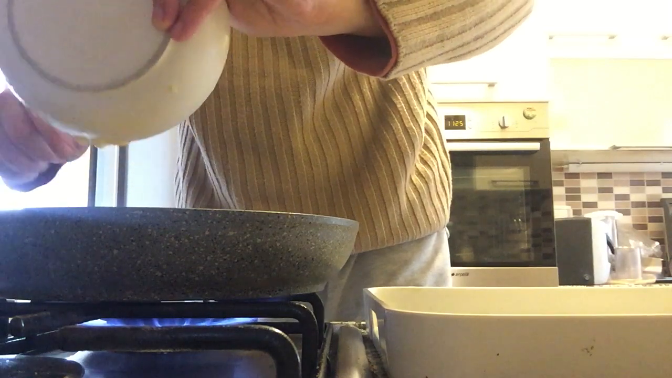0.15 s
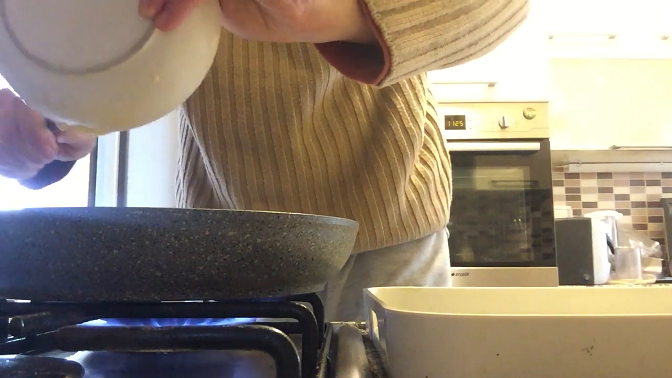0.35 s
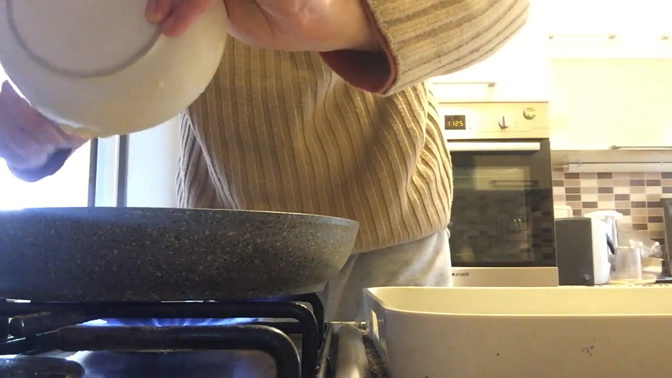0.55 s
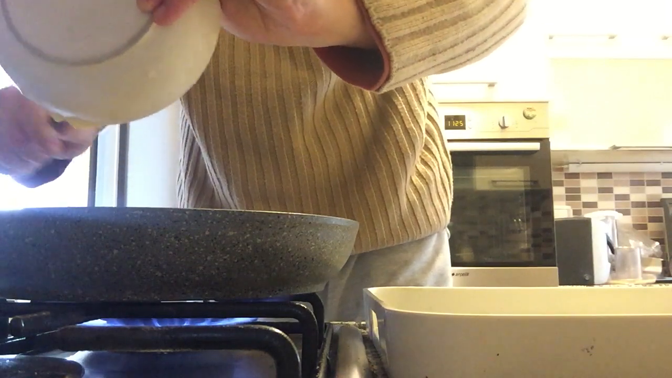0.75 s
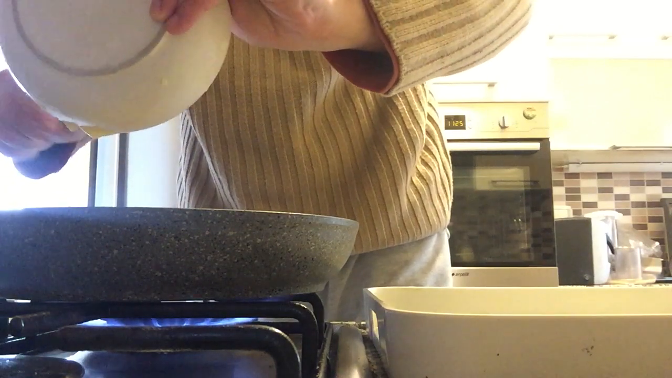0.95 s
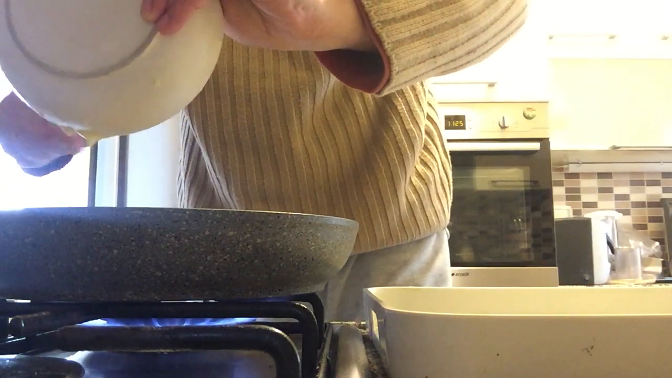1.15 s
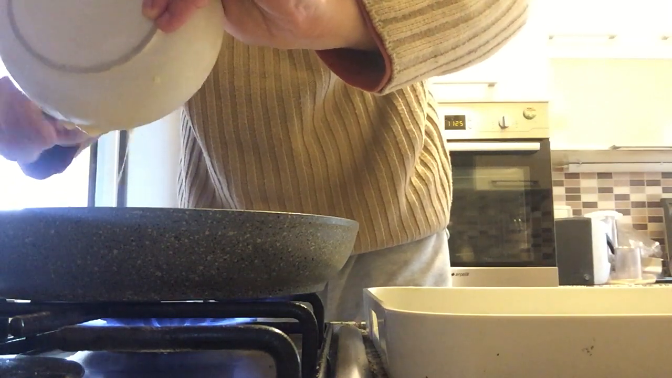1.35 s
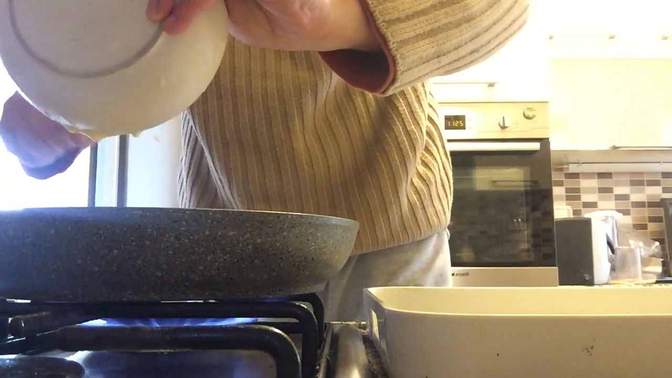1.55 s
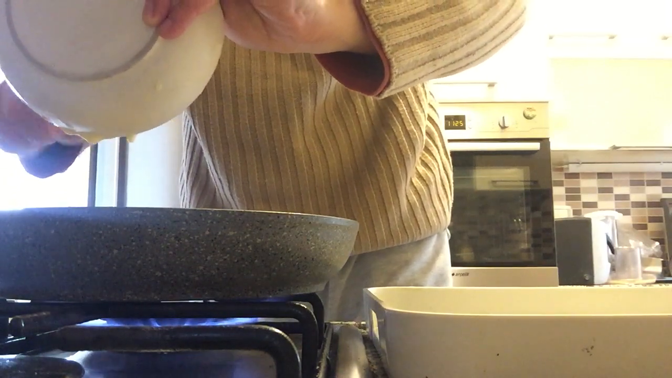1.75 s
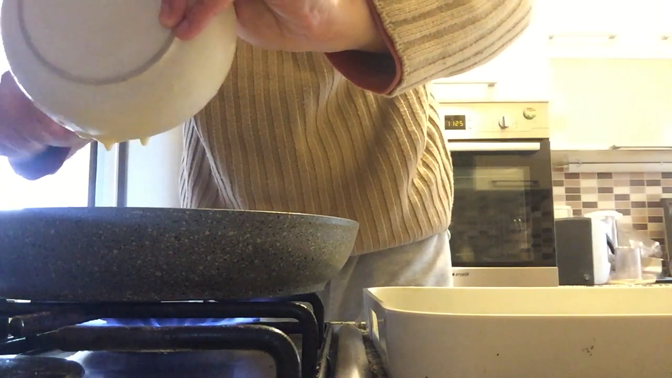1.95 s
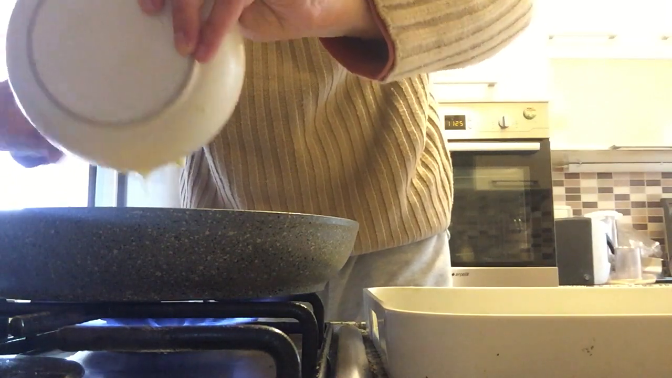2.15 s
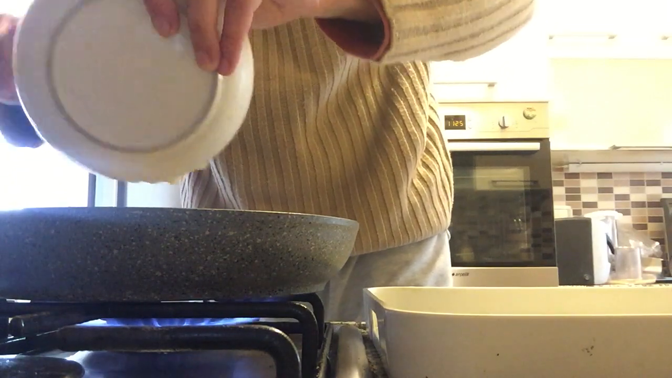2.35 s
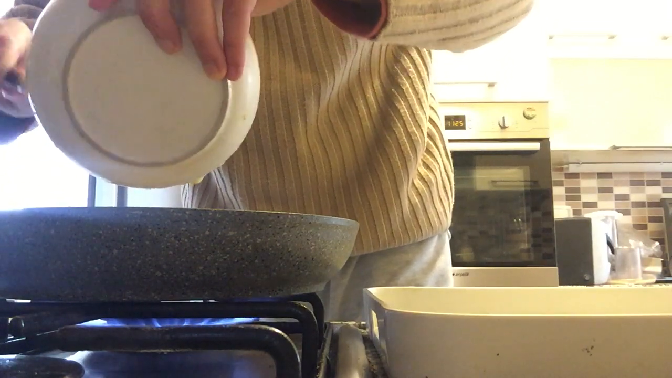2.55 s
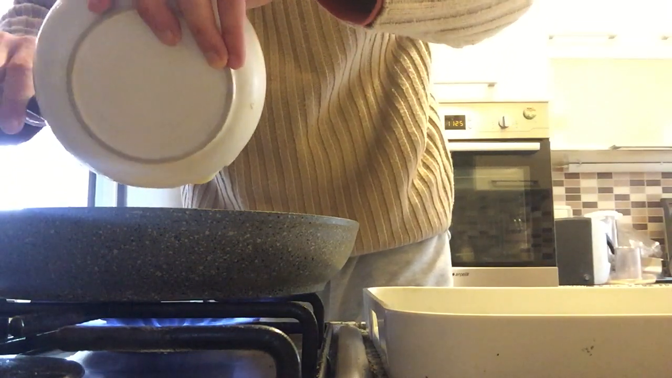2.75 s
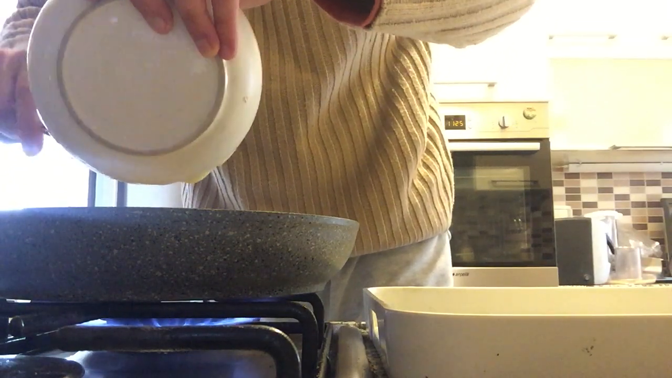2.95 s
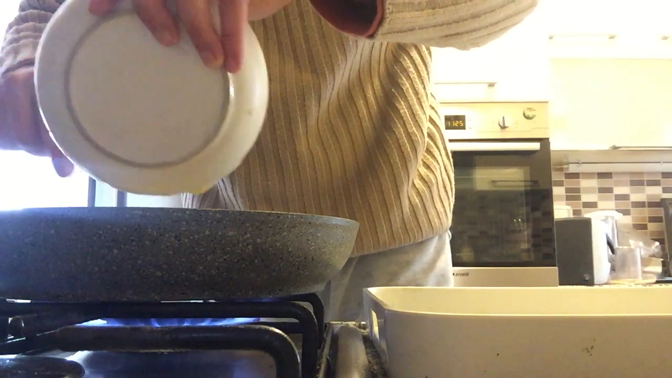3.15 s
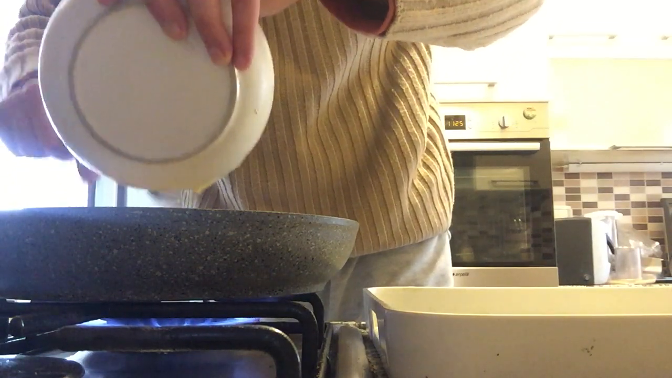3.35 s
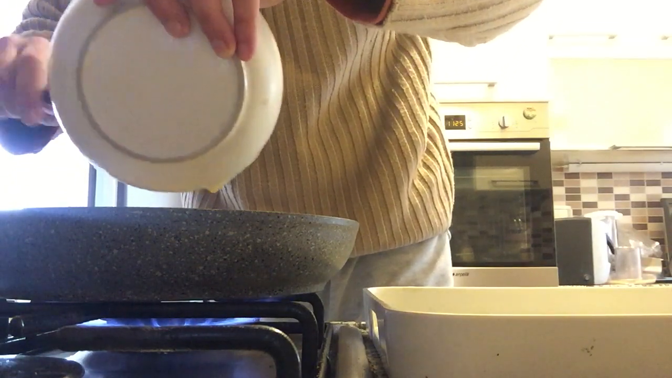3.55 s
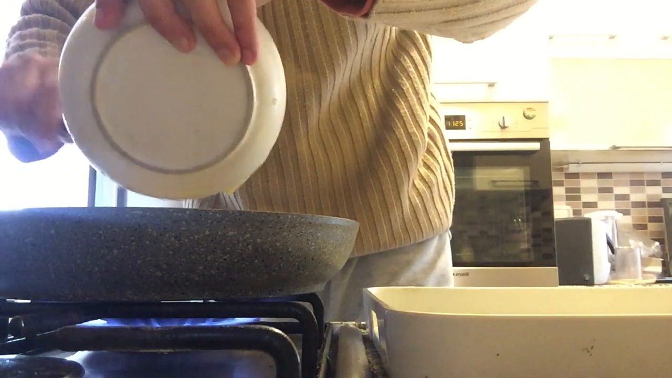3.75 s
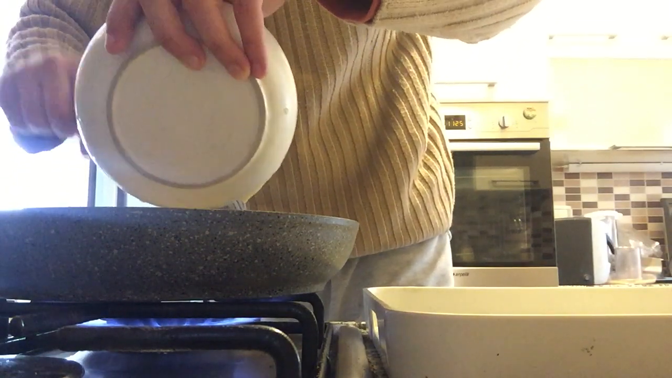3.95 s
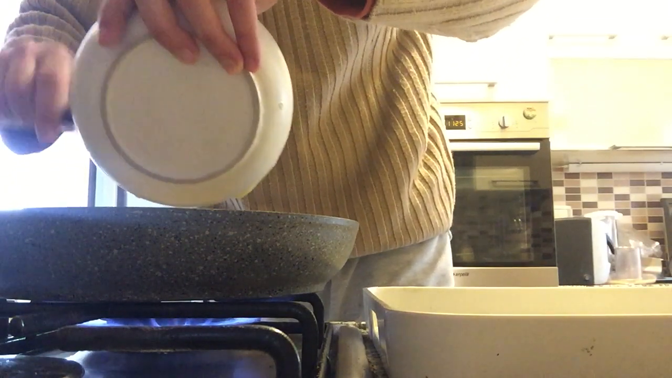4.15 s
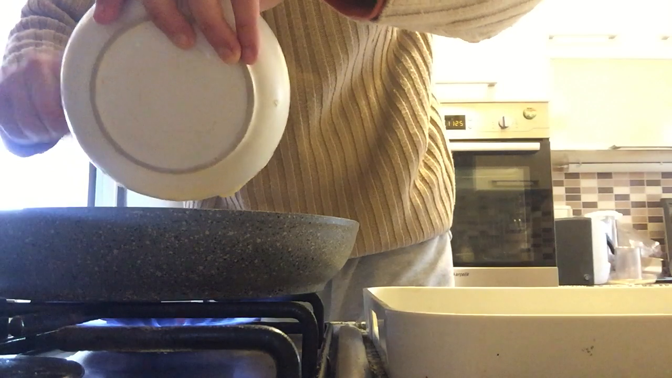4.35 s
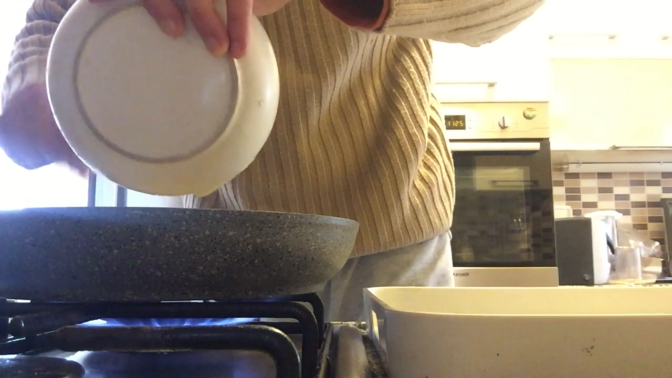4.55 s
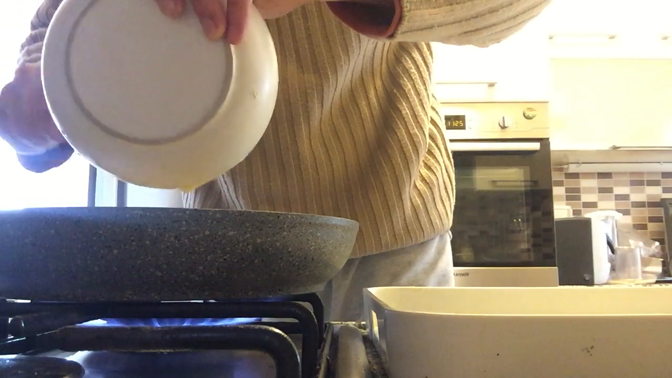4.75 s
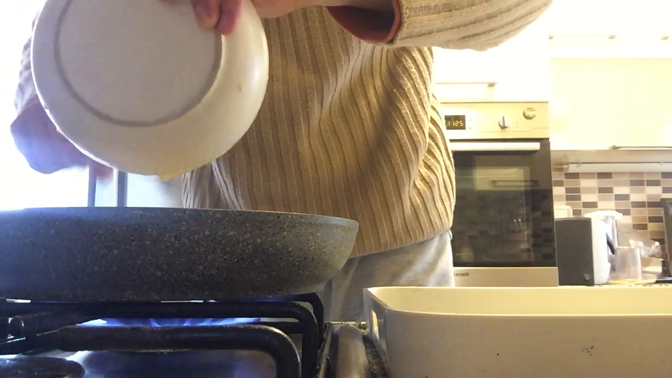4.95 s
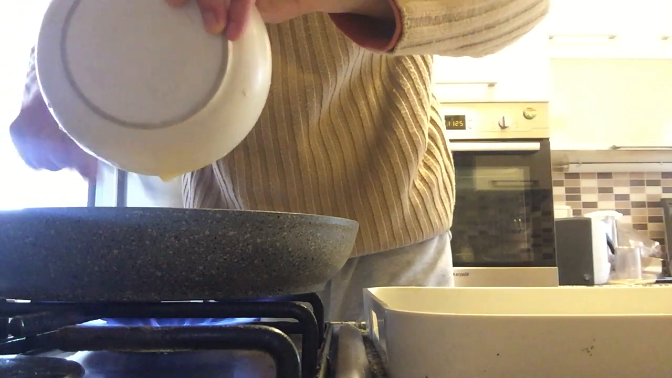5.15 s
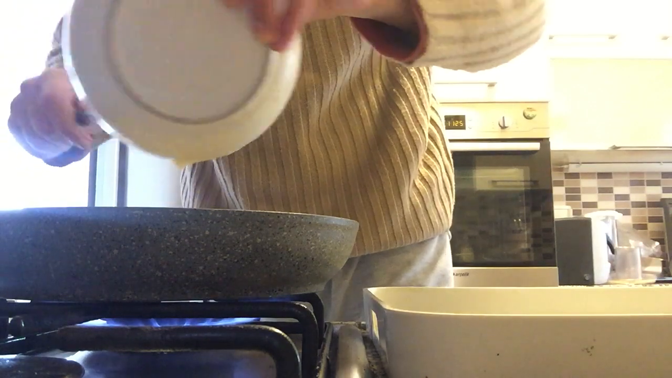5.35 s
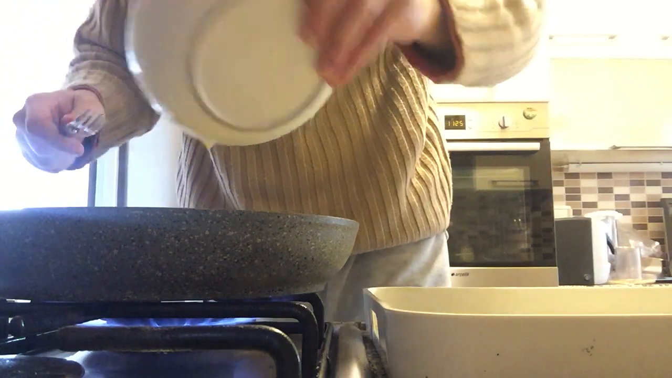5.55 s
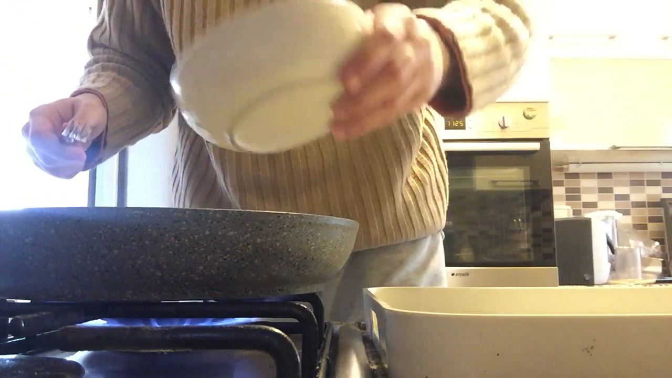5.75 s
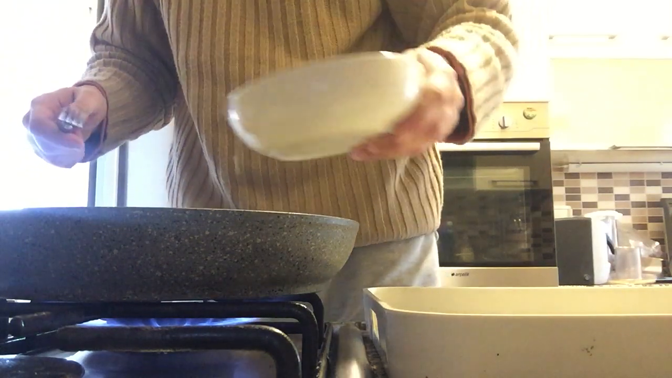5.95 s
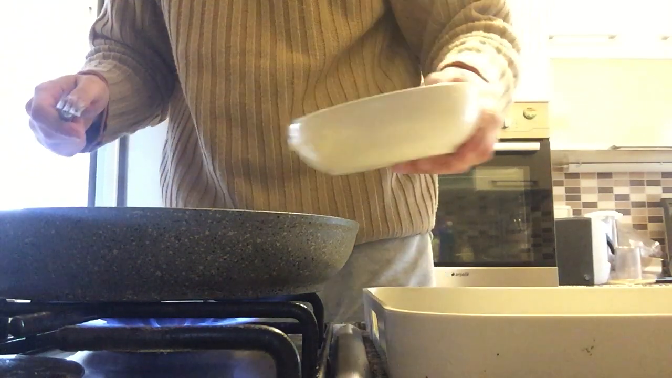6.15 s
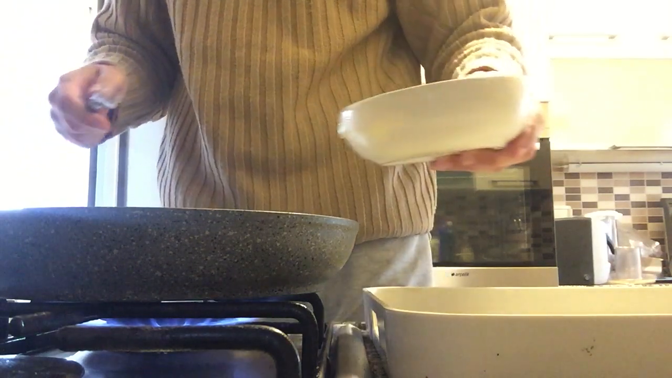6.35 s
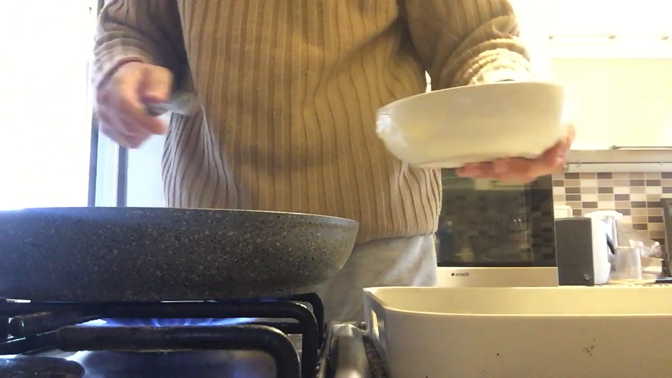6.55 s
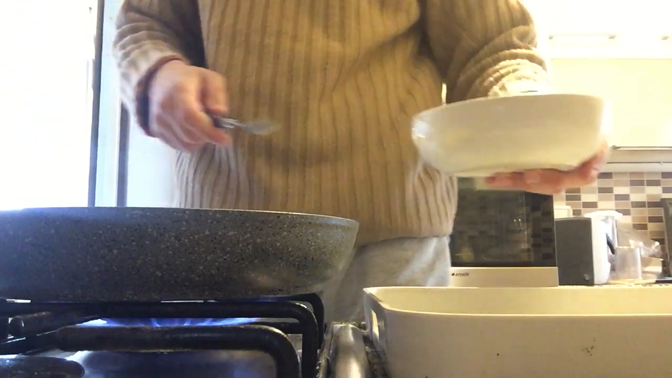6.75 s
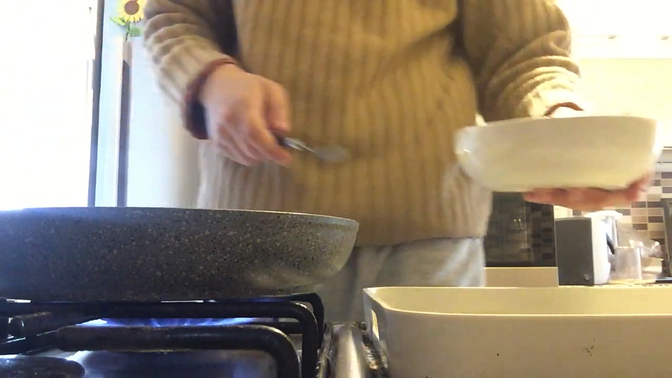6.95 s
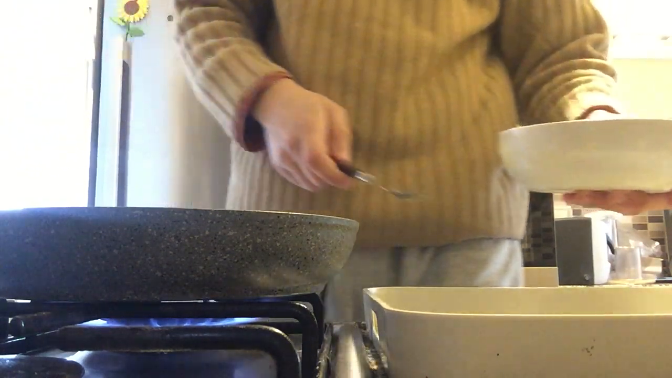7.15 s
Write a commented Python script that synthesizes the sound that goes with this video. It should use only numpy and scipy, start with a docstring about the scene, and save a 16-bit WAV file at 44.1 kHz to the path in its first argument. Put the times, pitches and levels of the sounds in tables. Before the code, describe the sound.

A gas burner hisses steadily for the whole seven seconds, with a low, wavering flame flutter underneath, heard close to the hob in a small kitchen. From the start a steel fork taps and scrapes inside a hand-held ceramic bowl. The clinks are short, bright and quickly damped, uneven in timing and strength, with a slight room echo. Clear ones come at about 0.8, 1.1 and 1.5 seconds, a loud one at 2.2, then others at 2.6, 3.4 and 3.7. Between them the tines drag over wet glaze in soft, brief rasps until about 4.4 seconds. A few light ticks lead to another loud clink at 4.9 seconds and a quick double clink at 5.2. After that the burner continues alone, apart from one faint, brief brush of a sleeve at about 6.7 seconds.

```python
"""A small kitchen, one microphone close to the hob, where a gas burner hisses under a frying pan.
A steel fork scrapes the last of some beaten egg out of a hand-held ceramic bowl into the pan.
Each touch rings the fork and the bowl, both quickly damped by the hands; between touches the tines
drag over wet glaze. Tiles and cupboards answer briefly, and near the end a sleeve brushes softly."""
import sys
import numpy as np
from scipy import signal
from scipy.fft import rfft, irfft
from scipy.io import wavfile

SR = 44100
rng = np.random.default_rng(int(sys.argv[2]) if len(sys.argv) > 2 else 0)


def store_wav(level_fs):
    """Save 16-bit WAV to argv[1]."""
    pcm = np.round(np.clip(np.atleast_2d(level_fs), -1, 1) * 32767)
    wavfile.write(sys.argv[1], SR, pcm.T.astype(np.int16))


N = 317074
RING, ATTACK = int(.25 * SR), int(.02 * SR)  # samples in one short sound, and in its attack
AGE = np.arange(RING) / SR  # seconds since that sound began

# the bowl's wall flexing: (pitch [Hz], t60 [s], level struck at the rim [dB], level struck deep [dB])
WALL_MODES = [(862, 0.057, -22, -15.5), (955, 0.013, -34, -7.5), (1595, 0.031, -31, 0),
              (1975, 0.075, -5, -8.5), (2065, 0.05, -2, -8.5), (2300, 0.069, 0.5, -12),
              (2800, 0.15, -11.5, -11), (3140, 0.028, -37, 5.5), (3415, 0.084, -6.5, -6),
              (3920, 0.092, 6.5, -22.5)]


def undb(db):
    """Decibels to gain."""
    return 10 ** (np.asarray(db) / 20)


def between(ends, share):
    """The value a share of the way from one end to the other."""
    return ends[0] + np.clip(share, 0, 1) * (ends[1] - ends[0])


def spectrum(points, size):
    """Gain of (Hz, dB) points on the frequency grid of a sound of this size."""
    hz, db = np.transpose(points)
    grid = np.maximum(np.fft.rfftfreq(size, 1 / SR), 1)
    return undb(np.interp(np.log(grid), np.log(hz), db))


def colour(x, points):
    """Causal filter with the given spectrum, so attacks stay sharp."""
    cepstrum = irfft(np.log(spectrum(points, size=2048)))
    half = len(cepstrum) // 2
    fold = np.r_[1, np.full(half - 1, 2), np.zeros(half)]
    response = irfft(np.exp(rfft(cepstrum * fold)))
    return signal.fftconvolve(x, response)[:len(x)]


def gliding_band(x, hz, width_hz):
    """One resonance whose centre moves."""
    turn = np.exp(2j * np.pi * np.cumsum(hz) / SR)
    pole = np.exp(-np.pi * width_hz / SR)
    return (turn * signal.lfilter([1], [1, -pole], x / turn)).real


def noise(gain):
    """Steady noise with the given amplitude per root Hz."""
    bins = rng.standard_normal(len(gain)) + 1j * rng.standard_normal(len(gain))
    return irfft(bins * gain, N) * np.sqrt(N * SR) / 2


def waver(per_s):
    """A random drift with a spread of 1."""
    steps = rng.standard_normal(512)
    return np.interp(np.arange(N) / SR * per_s, np.arange(len(steps)), steps) * np.sqrt(3 / 2)


def fade(t60):
    """Exponential decay, 60 dB down after t60 seconds."""
    return undb(-60 * AGE / t60)


def level(x, db):
    """Set the rms of a blow's attack."""
    return x * undb(db) / np.sqrt(np.mean(x[:ATTACK] ** 2))


def add(track, start_s, x):
    """Mix x into the track from this time on."""
    i = int(start_s * SR)
    track[i:i + len(x)] += x[:N - i]


def burner(hiss_waver_db=0.86, flame_waver_db=2.5):
    """Close by under the pan, turbulent gas sounds the burner's resonances; the flames flutter below."""
    # gas rushing through the burner: (frequency [Hz], density [dB per Hz])
    gas_rush = [(300, -106), (560, -102), (1000, -93), (1550, -101.5), (2000, -86), (2500, -101),
                (3350, -109), (4300, -103), (5500, -107), (7700, -100), (9600, -108), (11500, -99),
                (13900, -109), (15500, -105)]
    # mixing tube, burner head and gap under the pan: (pitch [Hz], width [Hz], density [dB per Hz])
    resonances = [(728, 31, -90), (1031.5, 32, -83), (1236, 51, -75), (1334.4, 134, -74), (1604, 31, -80.5),
                  (1740, 135, -75), (2170, 47, -83), (2407, 37, -93), (2620, 400, -99), (3135, 28, -90.5),
                  (3765, 145, -84.5), (4136, 18, -89), (4590, 62, -92.5), (4893, 93, -93.5),
                  (6450, 242, -87.5), (6940, 15, -87), (9050, 114, -93), (10400, 61, -92.5),
                  (11160, 550, -91), (11460, 150, -97), (12120, 100, -100), (12960, 170, -93.5),
                  (14400, 110, -105)]
    # low flutter of the flames: (frequency [Hz], density [dB per Hz])
    flame_flutter = [(25, -114), (50, -90.5), (70, -85.5), (92, -82.5), (110, -76.5), (135, -91.5),
                     (162, -90), (198, -82), (230, -88.5), (310, -89), (400, -94.5), (600, -110),
                     (1200, -130)]
    grid = np.fft.rfftfreq(N, 1 / SR)
    power = spectrum(gas_rush, N) ** 2
    for hz, width_hz, db in resonances:
        power += undb(db) ** 2 / (1 + 2 * ((grid - hz) / width_hz) ** 2) ** 2
    hiss = noise(np.sqrt(power))
    flame = noise(spectrum(flame_flutter, N))
    return hiss * undb(hiss_waver_db * waver(per_s=13)) + flame * undb(flame_waver_db * waver(per_s=14))


def chatter(roll_s, later_db=-6):
    """Force of a touch: one tine lands first and the other three follow within the roll time."""
    force = np.zeros(ATTACK)
    force[0] = 1
    lags = np.clip(rng.random(3) * roll_s * SR, 1, ATTACK - 1).astype(int)
    force[lags] += undb(later_db)
    return force


def ring(force, hz, t60, build_cycles=5, split=0.0043):
    """A driven mode: a close pair that beats and takes some cycles to build, so low modes speak later."""
    beating = np.cos(2 * np.pi * hz * split * rng.random() * AGE)
    build = 1 - np.exp(-AGE * hz / build_cycles)
    mode = np.sin(2 * np.pi * hz * AGE) * beating * fade(t60) * build
    return level(signal.fftconvolve(force, mode)[:RING], 0)


def bowl(force, modes, depth, knock_db=0, ring_left=1, knock_hz=1200, grip_detune=0.013):
    """The point of contact sets each mode's share; fork and fingers damp it and pull its pitch a little."""
    pulls = 1 + grip_detune * rng.standard_normal(len(modes))
    out = np.zeros(RING)
    for (hz, t60, rim_db, deep_db), pull in zip(modes, pulls):
        mode_db = between((rim_db, deep_db), depth) + knock_db * (hz < knock_hz)
        out += undb(mode_db) * ring(force, hz * pull, t60 * ring_left)
    return out


def tines(roll_s, hz, t60=0.015, mismatch=0.027, overtone_hz=13850, overtone_db=-10):
    """Four tines of slightly different pitch give a short, dense ping with a thin overtone."""
    ping = sum(ring(chatter(roll_s), hz * (1 + mismatch * step), t60) for step in np.linspace(-1, 1, 4))
    overtone = ring(chatter(roll_s), overtone_hz * (1 + .015 * rng.standard_normal()), t60)
    return ping + undb(overtone_db) * overtone


def crack(force, thud_db, thud_hz=700, t60=0.044):
    """The dense, short-lived noise of a touch, with a thud at its low end."""
    # colour of the crack: (frequency [Hz], relative level [dB])
    crack_colour = [(100, -12), (550, 1.5), (1000, 9), (1500, -17), (3000, -1.5), (4600, -4), (6800, 6),
                    (9000, 8.5), (10400, 2), (11500, 6), (14000, -1.5), (16000, -5)]
    burst = signal.fftconvolve(force, rng.standard_normal(RING) * fade(t60))[:RING]
    return colour(burst, [(hz, db + thud_db * (hz < thud_hz)) for hz, db in crack_colour])


def touches(medium_db=-32.5, handover=0.23, tine_pressed_hz=7320, tine_free_hz=9200):
    """The fork meets the bowl and both ring: square blows chink the bowl, flicks ping the tines."""
    # fork on bowl: (time [s], strength [dB], brightness [dB], glance [0 square blow to 1 flick],
    # depth [0 rim to 1 deep inside], roll time of the tines [s], pitch of the fork's neck [Hz])
    blows = [ (0.0284, -49.5, 0.5, 0.91, 0.11, 0.00092, 2374), (0.398, -49.5, 3, 0.55, 0.53, .002, 2330),
             (0.7405, -42, -7.5, 0.42, 0.15, .003, 2270), (.779, -51, 2.5, 0.67, .35, .0023, 2330),
             (0.8434, -37.5, -3.5, 0.22, 0.089, 0.004, 3540), (1.1274, -32, 2, .1, 0.093, 0.0023, 1950),
             (1.222, -55.5, 2, .7, 0.18, .0038, 4230), (1.4623, -36, -0.5, 0.046, 0, 0.002, 2870),
             (1.516, -55.5, 11, .45, .1, 0.0055, 2420), (1.5551, -34.5, -3, 0.78, .45, 0.0066, 3397),
             (1.7935, -44, -9.5, 0.31, 0.043, 0.0041, 2275),
             (1.8596, -45.5, -0.5, 0.96, 0.035, 0.00091, 2270), (2.1631, -28, 2, .3, .45, 0.0048, 3160),
             (2.2253, -49.5, 5.5, .05, .1, .0058, 3740), (2.3207, -47.5, -1.5, 0.53, 0.46, .01, 2604),
             (2.5826, -37, -3, 0.13, 0.64, 0.0043, 1980), (3.3598, -36, -0.5, 0.72, 0.61, .0085, 2580),
             (3.6872, -36, 3, 0.37, 0.72, 0.0019, 2016), (4.209, -51.5, -0.5, 0.94, 0, .001, 3720),
             (4.281, -49, 0, .15, 0.6, .003, 2640), (4.642, -49.5, 5, 0.086, 0.027, .007, 2660),
             (4.8041, -66, 13.5, .2, 0.46, .0022, 2600), (4.9362, -27.5, 1, 0.049, 0.73, 0.0026, 2020),
             (5.2301, -36.5, 4.5, 0.43, 0.76, .0018, 1900), (5.2502, -40, -0.5, 0.59, 0.53, 0.0025, 2500)]
    # the bowl's bright modes: (pitch [Hz], t60 [s], level struck at the rim [dB], level struck deep [dB])
    chink_modes = [(4600, 0.12, -15.5, -13), (5130, .05, -17.5, 0), (5930, 0.11, -8.5, 5),
                   (6630, 0.09, -35, 28), (6550, 0.024, -4, 8.5), (6790, 0.041, -3, 15),
                   (7350, .04, -39, -1), (8000, 0.057, -7.5, 13.5), (9400, .035, -20, -29),
                   (9600, 0.051, -7.5, -25)]
    out = np.zeros(N)
    for start_s, db, bright_db, glance, depth, roll_s, neck_hz in blows:
        force = chatter(roll_s)
        treble_db, heavy_db = db + bright_db, db - medium_db
        knock_db = -3 + 0.3 * heavy_db  # only heavy blows flex the whole wall
        thud_db = knock_db + between((2, -5.5), depth)  # a blow on the rim rocks the whole bowl
        ring_left = between((.65, .95), glance)  # the fork stays on after a blow, lifts after a flick
        wall = bowl(force, WALL_MODES, depth, knock_db, ring_left)
        chink = bowl(force, chink_modes, depth, ring_left=ring_left)
        neck = ring(force, neck_hz, t60=0.022, build_cycles=45)
        ping = tines(roll_s, between((tine_pressed_hz, tine_free_hz), glance))
        # a heavy blow holds the fork's neck still and hands its ring to the wall
        wall = level(wall, db + between((0.5, -6), depth) + handover * max(heavy_db, 0))
        neck = level(neck, db + between((-7, 0.5), depth) - handover * heavy_db)
        chink = level(chink, treble_db + between((1, -10.5), glance))
        ping = level(ping, treble_db + between((-6.5, 5), glance))
        snap = level(crack(force, thud_db), treble_db - 6 + 0.13 * heavy_db)
        direct = wall + chink + neck + ping + snap
        # the wide bowl fills the room better than the thin tines do
        into_room = wall + chink + neck + undb(-3) * ping + undb(5) * snap
        add(out, start_s, direct + kitchen(into_room))
    return out


def kitchen(x, t60=0.21, wet_db=-9, first_s=0.0083, dull_hz=9000, echoes_per_s=2500):
    """Dull echoes off hob, tiles and cupboards, different each time because the bowl moves."""
    echoes = rng.standard_normal(RING) * (rng.random(RING) < echoes_per_s / SR)
    echoes *= fade(t60) * (AGE > first_s)
    echoes /= np.sqrt(np.sum(echoes ** 2))
    echoes = signal.sosfilt(signal.butter(1, dull_hz, fs=SR, output="sos"), echoes)
    return undb(wet_db) * signal.fftconvolve(x, echoes)[:RING]


def pressure(length_s, peak_share=0.1, judder_db=2.3):
    """The hand presses quickly and eases off slowly; the fork judders on the way."""
    rise = np.interp(AGE / length_s, [0, peak_share, 1], [0, 1, 0])
    return np.sin(np.pi / 2 * rise) * undb(judder_db * waver(per_s=60)[:RING])


def catches(length_s, fork_hz, per_s=35, neck_db=-11, tine_db=-13, tine_hz=8000, scatter=0.122):
    """Now and then a tine snags and lets go, ringing the fork a little differently each time."""
    out = np.zeros(N)
    for start_s in rng.random(round(per_s * length_s)) * length_s:
        neck_shift, tine_shift = np.exp(scatter * rng.standard_normal(2))
        neck = ring(chatter(roll_s=.002), fork_hz * neck_shift, t60=0.017)
        ping = tines(roll_s=0.004, hz=tine_hz * tine_shift)
        add(out, start_s, level(neck, neck_db) + level(ping, tine_db))
    return out[:RING]


def scrapes(slips_per_s=1800, uneven_db=2.5, sag_oct_per_s=3.4, rasp_db=-11, fork_db=-3.5, wall_db=-8):
    """Tiny uneven slips on wet glaze make a soft rasp that sounds the fork's neck and the bowl."""
    # tines dragged over the glaze: (time [s], length [s], level [dB], fork's starting pitch [Hz])
    strokes = [ (0.088, 0.17, -54.5, 2680), (0.465, 0.12, -46.5, 3430), (0.828, 0.11, -48.5, 3260),
               (1.17, 0.2, -54.5, 3400), (1.476, 0.18, -49, 3470), (1.882, 0.17, -56.5, 2760),
               (2.142, 0.24, -48.5, 3220), (2.64, .12, -57, 2820), (3.215, 0.052, -52, 3820),
               (3.343, .1, -46.5, 2500), (3.779, 0.19, -48.5, 2380), (3.961, .1, -57.5, 2900),
               (4.277, .1, -48, 2200)]
    # colour of the rubbing: (frequency [Hz], relative level [dB])
    rub_colour = [(200, -12), (600, -3), (1500, 4), (2500, -3), (3700, -6.5), (5200, -7.5), (6700, 4.5),
                  (8500, 0), (11000, -21), (16000, -21)]
    out = np.zeros(N)
    for start_s, length_s, db, fork_hz in strokes:
        slips = (rng.random(RING) < slips_per_s / SR) * rng.choice([-1, 1], RING)
        slip_sizes = undb(uneven_db * rng.exponential(size=RING))
        rasp = colour(slips * slip_sizes, rub_colour)
        sagging_hz = fork_hz * 2 ** (-sag_oct_per_s * AGE)  # the pitch sags as the hand eases
        fork = gliding_band(rasp, sagging_hz, width_hz=450)
        wall = bowl(rasp, WALL_MODES, depth=0.12)
        parts = (rasp, rasp_db), (fork, fork_db), (wall, wall_db)
        rub = sum(undb(part_db) * part / part.std() for part, part_db in parts)
        stroke = undb(db) * pressure(length_s) * (rub + catches(length_s, fork_hz))
        add(out, start_s, stroke + kitchen(stroke))
    return out


def sleeve(start_s=6.66, length_s=0.064, db=-57, hz=950, width_hz=350):
    """A soft brush of cloth swells and fades as the arms draw back."""
    band = signal.iirpeak(hz, hz / width_hz, fs=SR)
    brush = signal.lfilter(*band, signal.lfilter(*band, rng.standard_normal(RING)))
    swell = np.sin(np.pi * np.clip(AGE / length_s, 0, 1))
    out = np.zeros(N)
    add(out, start_s, undb(db) * swell * brush / brush.std())
    return out


def scene():
    """Fork, bowl and sleeve over the burner, heard in mono from beside the hob."""
    return (touches() + scrapes() + sleeve() + burner())[None]


def record(dry, low_cut_hz=44, top_hz=16200):
    """The small microphone loses the deep bass; the recorder cuts the top."""
    thin = signal.sosfilt(signal.butter(6, low_cut_hz, "high", fs=SR, output="sos"), dry)
    return signal.sosfilt(signal.ellip(10, .2, 70, top_hz, fs=SR, output="sos"), thin)


dry = scene()
out = record(dry)
store_wav(out)
```